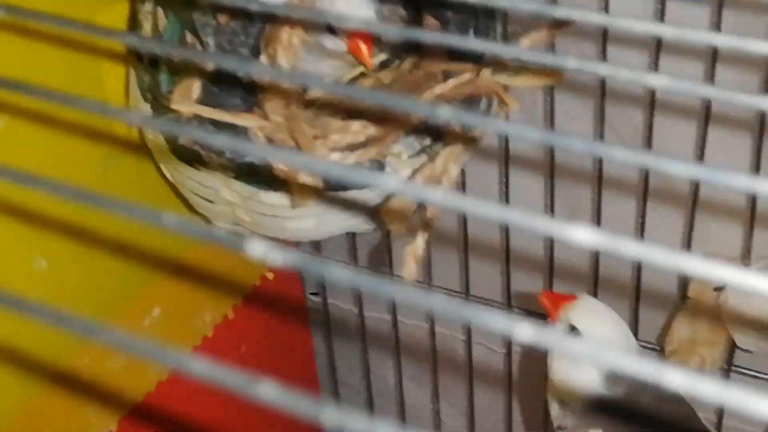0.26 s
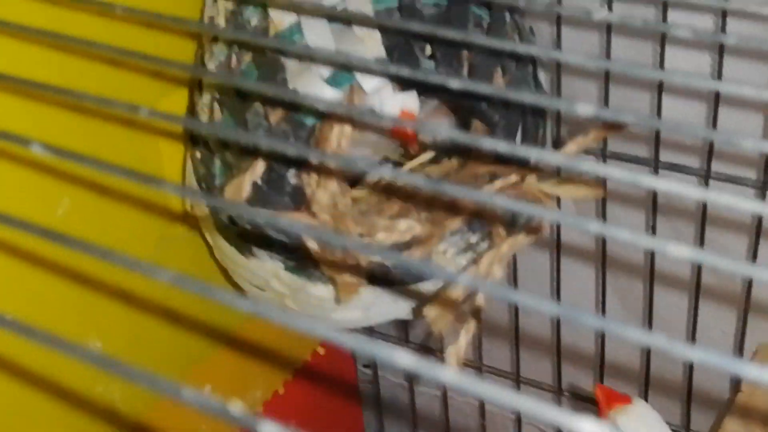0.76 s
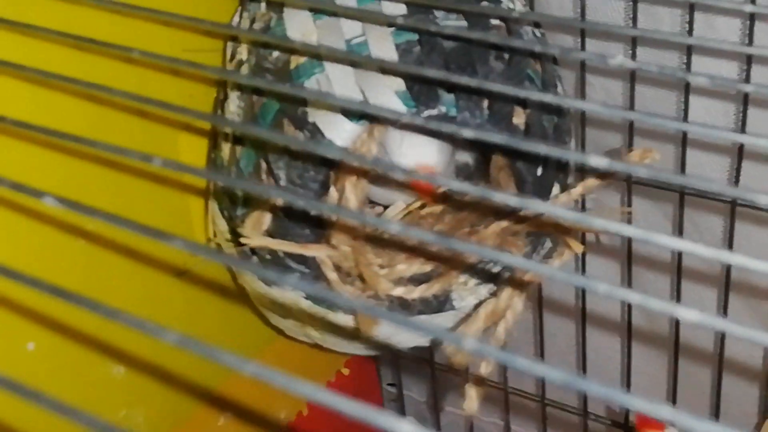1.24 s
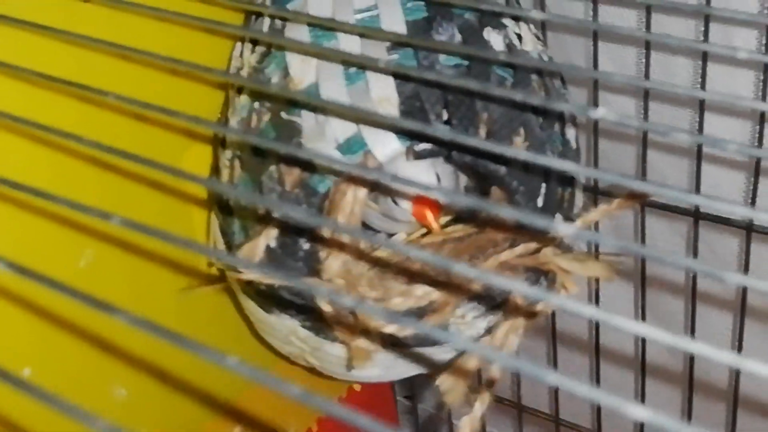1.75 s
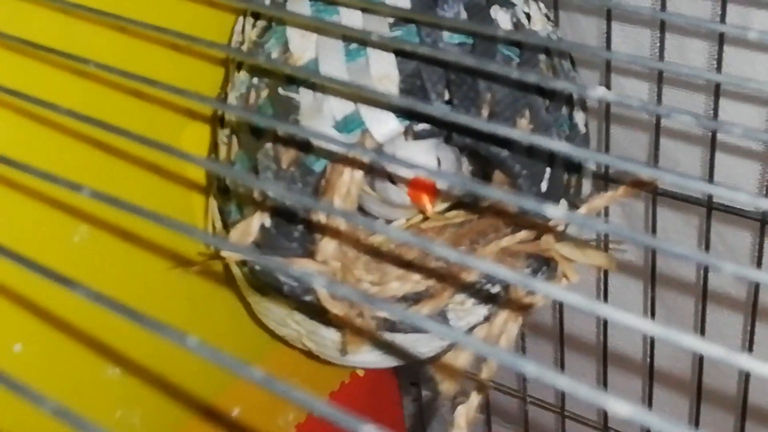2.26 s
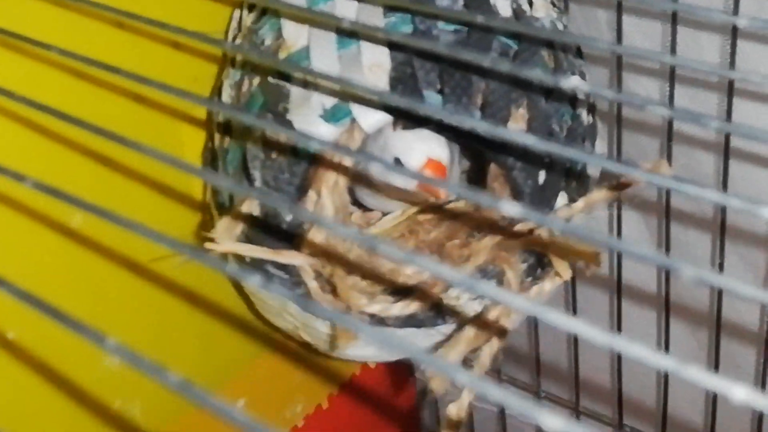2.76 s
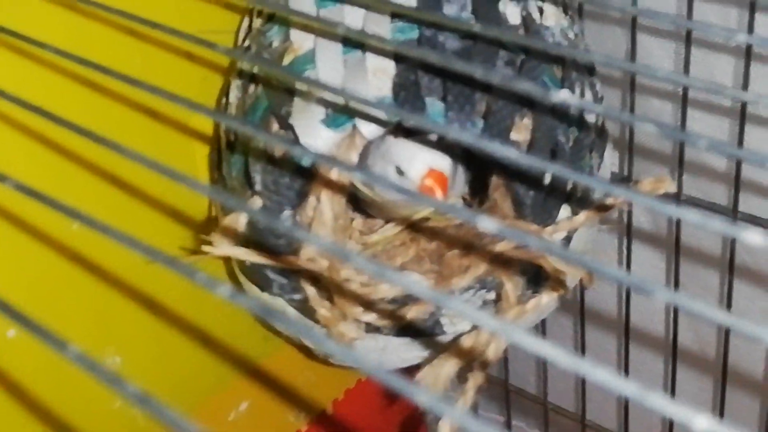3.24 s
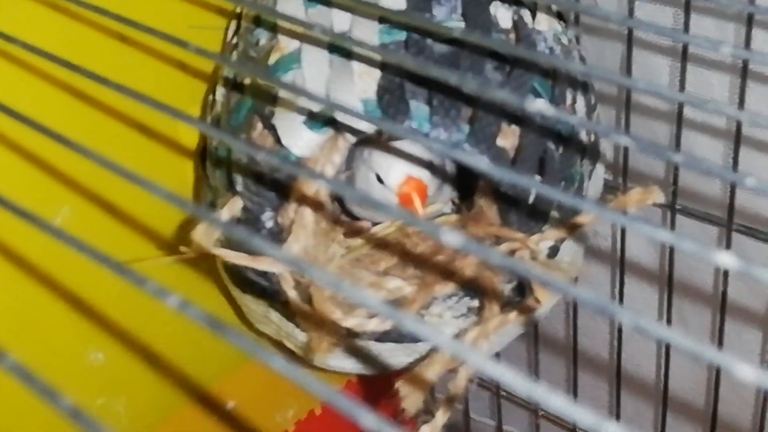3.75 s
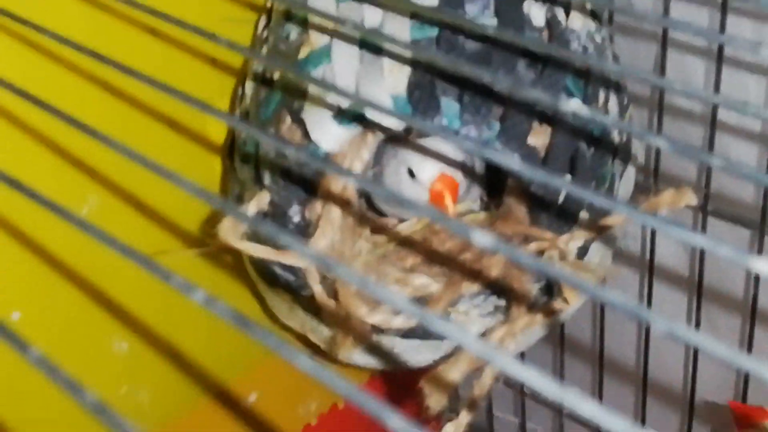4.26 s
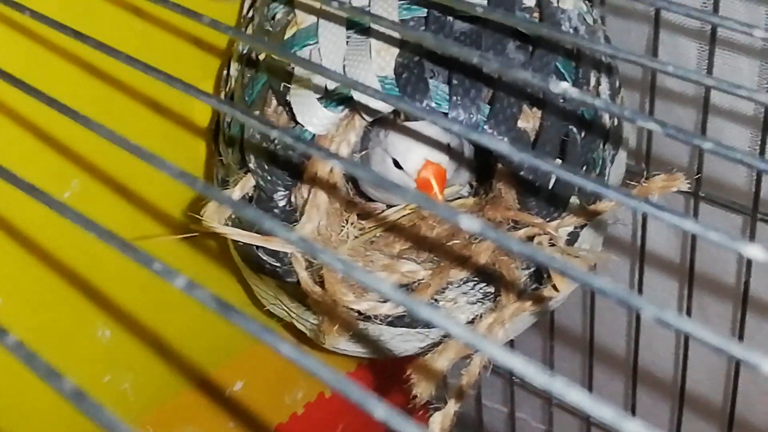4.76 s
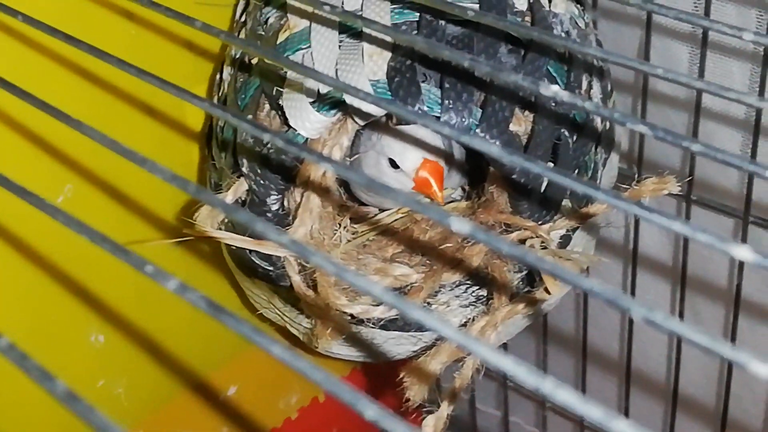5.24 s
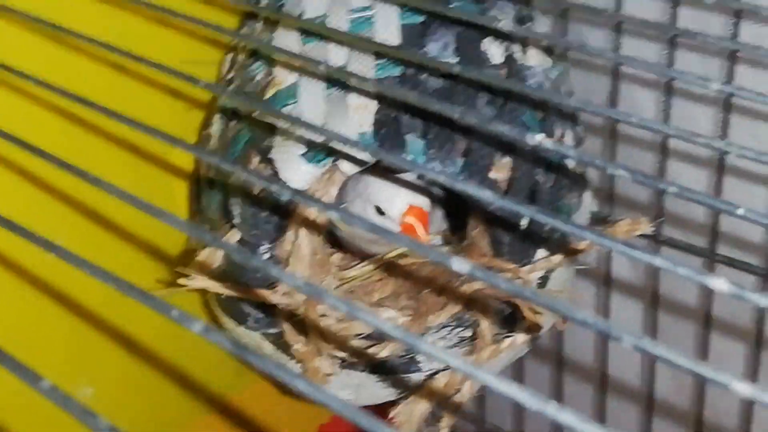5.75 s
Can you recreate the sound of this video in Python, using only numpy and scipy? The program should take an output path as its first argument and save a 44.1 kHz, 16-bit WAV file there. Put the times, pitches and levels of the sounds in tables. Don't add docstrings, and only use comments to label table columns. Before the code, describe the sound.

A male zebra finch sings close by in a wire cage indoors. From the start until about 3.3 s it runs through the same tune four times, each about 0.85 s: a nasal hum, sharp high ticks, a rasp, a piercing short whistle around 7 kHz, a clear bell-like note, then buzz, peal, growls and more ticks. At 3.3 s there is a very quiet murmur, then near silence with soft feather brushes around 4.0 s. Two nasal barks come at 4.1 and 4.2 s, three bright clangs at 4.4, 4.6 and 4.7 s, with a tiny flick of rustle, and a buzzy chirp at 4.9 s. The tune returns from 5.05 s to the end. At 5.9 s dull perch knocks and a strong grainy rustle join. Small-room echo, low building drone, faint hiss and soft handling rumble; handheld stereo, bird toward the right.

```python
import sys
import numpy as np
from scipy import signal
from scipy.fft import rfft, irfft, next_fast_len
from scipy.io import wavfile

SR = 44100
rng = np.random.default_rng(int(sys.argv[2]) if len(sys.argv) > 2 else 0)


def invert_db(x):
    u = np.asarray(x, float) / 20
    return 10 ** u


def store_wav(level_fs):
    pcm = np.round(np.clip(np.atleast_2d(level_fs), -1, 1) * 32767)
    wavfile.write(sys.argv[1], SR, pcm.T.astype(np.int16))


N = 264600
RUN_IN = SR // 10


def rms_one(x):
    return x / np.sqrt(np.mean(x ** 2) + 1e-20)


def at_hz(points, hz):
    points = np.array(points)
    return np.interp(np.log(hz), np.log(points[:, 0]), points[:, 1])


def wobble(shape, rate_hz):
    white = rng.standard_normal(shape)
    slow = signal.butter(2, rate_hz, fs=SR, output="sos")
    return signal.sosfilt(slow, white) * np.sqrt(SR / 2.2 / rate_hz)


def add(out, x, s):
    i = round(s * SR)
    x = x[max(-i, 0):len(out) - i]
    start = max(i, 0)
    out[start:start + len(x)] += x


def coloured(points, patchy_db):
    # (frequency [Hz], likeness [-1 to 1])
    likeness = [(60, 0.96), (180, 1), (550, -1.3), (1650, 0.089), (4970, 0.57), (15000, 0.096)]
    out = 0
    edges = 22 * 2 ** np.arange(0, 9.6, .5)
    white = rng.standard_normal((2, 2, N))
    flicker = wobble((len(edges), N // 64 + 1), 500)
    for k, (low, high) in enumerate(zip(edges, edges[1:])):
        hz = np.sqrt(low * high)
        if not points[0][0] < hz < points[-1][0]:
            continue
        band = signal.butter(2, [low, high], "band", fs=SR, output="sos")
        mid, side = signal.sosfilt(band, white[k % 2])
        alike = np.clip(at_hz(likeness, hz), -1, 1)
        flicker_here = np.interp(np.arange(N) / 64, np.arange(N // 64 + 1), flicker[k])
        gain = invert_db(at_hz(points, hz) + patchy_db * flicker_here)
        out = out + gain * (np.sqrt(1 + alike) * mid + np.sqrt(1 - alike) * side * [[1], [-1]])
    return rms_one(out)


def air():
    # (frequency [Hz], level per Hz [dB])
    air_colour = [(240, -39), (400, -10.5), (419, -24), (466, -6), (587, -10.5), (695, 14.5), (1100, 0),
                  (10800, -9), (15600, -16.5)]
    air_db = -76.5
    return invert_db(air_db + 12) * coloured(air_colour, patchy_db=1.0)


def drone():
    # (frequency [Hz], level per Hz [dB])
    drone_colour = [(12, -37), (20, -9.5), (54, -2.5), (140, -12.5), (200, -28), (260, -57.5), (440, -120)]
    return invert_db(-61.5) * coloured(drone_colour, patchy_db=3.0)


def handling():
    # (frequency [Hz], level per Hz [dB])
    hand_colour = [(41, -39), (70, -6), (113, -1), (177, -17.5), (249, -2.5), (510, -34), (600, -11.5),
                   (780, -55.5), (1320, -120)]
    # (time [s], level [dB])
    hand_levels = [(0.0, -34.5), (0.05, -39.5), (0.8, -56), (0.9, -44), (1.22, -60), (1.34, -41.5),
                   (1.67, -55.5), (1.82, -49.5), (1.89, -58.5), (2.59, -77), (2.86, -41.5), (2.94, -61.5),
                   (4.31, -63), (5.25, -84), (5.75, -55.5), (5.85, -73), (5.92, -54), (6.0, -44)]
    hand_db = np.interp(np.arange(N) / SR, *np.transpose(hand_levels))
    return invert_db(hand_db - 3.0) * coloured(hand_colour, patchy_db=6.5)


def knocks():
    # (time [s], frequency [Hz], level [dB], time to fall 60 dB [s])
    perch_hits = [
        (5.904, 281, -35.5, 0.044),
        (5.92, 300, -37.5, 0.053),
        (5.953, 284, -27.5, 0.019),
        (5.963, 110, -44, 0.051),
    ]
    out = np.zeros(N)
    t = np.arange(SR // 5) / SR
    for s, hz, level_db, t60 in perch_hits:
        add(out, invert_db(level_db - 60 * t / t60) * np.sin(2 * np.pi * hz * t), s)
    return out


def rustles():
    # (time [s], length [s], level [dB])
    brushes = [
        (3.96, 0.091, -53),
        (4.094, 0.037, -58),
        (4.689, 0.011, -49),
        (5.88, 0.053, -33),
        (5.919, 0.06, -39),
        (5.944, 0.18, -26),
    ]
    # (frequency [Hz], level per Hz [dB])
    feather_colour = [(300, -12), (1500, -4.5), (3000, 0), (6000, 0), (9000, -1.5), (15000, -27.5)]
    swell = np.zeros(N)
    for s, length, level_db in brushes:
        add(swell, invert_db(level_db) * signal.windows.tukey(round(length * SR), .6), s)
    grain = invert_db(1.5 * wobble(N, 150))
    return swell * grain * coloured(feather_colour, patchy_db=3.5)


def gesture(kind, length, onset_hz, end_hz, level_db):
    gestures = {"stack": (.18, .2, 1.5, 4.5), "tick": (.22, .3, .6, 1.5), "drop": (.15, .45, -9.5, 2.2),
                "rasp": (.15, .25, -8.5, 1.6), "whistle": (.25, .3, -4.5, 4.5), "bell": (.2, .22, 1.5, 9.5),
                "peal": (.2, .12, 8.5, 3.5), "tail": (.2, .2, 1.5, 1.2), "murmur": (.45, .3, 3.5, 1.3),
                "mutter": (.4, .3, -.6, 1.3), "growl": (.1, .3, -1.5, 1.3), "bark": (.2, .22, 1.5, .75),
                "chime": (.2, .25, 6.5, 5.5), "hum": (.2, .25, 1.5, 2.5), "ring": (.27, .33, 4.5, 2.5),
                "slide": (.3, .2, 6.5, 1.4), "clang": (.3, .48, -1.5, 6.5), "buzz": (.42, .38, .6, 1.2),
                "peep": (.2, .4, .6, 1.5)}
    voices = {"stack": (.1, .01, 5.5), "slide": (.35, .3, 1.5), "hum": (.1, .025, 4.5),
              "ring": (.08, .012, 4.5), "tick": (.01, .008, 1.5), "drop": (.15, .35, 1.5),
              "rasp": (.55, .35, 2.5), "whistle": (.01, .003, 2.5), "bell": (.5, .012, 6.5),
              "chime": (.95, .012, 3.2), "peal": (.8, .006, 7.5), "clang": (.9, .004, 8.5),
              "buzz": (.6, .13, 2.5), "growl": (.55, .1, 2.2), "bark": (.6, .04, 2.2),
              "tail": (.3, .1, 1.5), "peep": (.05, .6, 1.5), "murmur": (.6, .7, 1.5),
              "mutter": (.6, .7, 1.5)}
    throats = {"slide": (4400, 4200), "hum": (4800, 3000), "ring": (4800, 3900), "bell": (6500, 3900),
               "chime": (7300, 3400), "peal": (5000, 3800), "clang": (5900, 3400), "tail": (2700, 3300),
               "murmur": (1500, 1400), "mutter": (3300, 3100), "stack": (4700, 3850), "rasp": (7400, 4300),
               "buzz": (5200, 4000), "growl": (5100, 4400), "bark": (3900, 3400), "peep": (1900, 3100)}
    attack, release, swell_db, bend = gestures[kind]
    rough_onset, rough, clearing = voices[kind]
    attack, release = np.clip([attack, release], .03, .48)
    done = np.r_[0, np.linspace(attack, 1 - release, num=6), 1]
    left = 1 - done
    pitch = end_hz + (onset_hz - end_hz) * left ** bend
    pitch = pitch * (1 - .025 * (left == 0))
    level = level_db + swell_db * np.clip((done - attack) / (1 - attack - release), 0, 1)
    throat = pitch
    if kind in throats:
        throat_onset, throat_end = throats[kind]
        throat = throat_end + (throat_onset - throat_end) * left ** 1.156
    roughness = rough + (rough_onset - rough) * left ** clearing
    return list(zip(done * length, pitch, level, roughness, throat))


def note(rows, factor, beak_db, chest_db):
    # (frequency [Hz], level [dB])
    windpipe = [(500, -32), (1300, -6), (2000, -8), (3000, 2), (4500, -3.5), (6300, -2), (7600, -8.5),
                (9000, -6.5), (10500, -10), (12500, -25.5), (14200, -26.5), (16000, -52.5)]
    throat_width_hz, throat_peak_db = 1940, 13
    upper_ratio, upper_db = 1.95, 4
    chest_hz, chest_width_hz = 1570, 980
    breath_per_octave = .17

    s, *columns = np.transpose(sorted(rows))
    t = np.arange(s[0], s[-1], 1 / SR)
    pitch, level_db, rough, throat = [np.interp(t, s, c) for c in columns]
    rough = np.clip(rough, 0, 1)
    size = 4000
    waver, beat = wobble((2, size), 270)[:, -len(t):]
    k = np.arange(1, min(33, 2 + int(.4 * SR / pitch.min())))[:, None]
    blur = wobble((2, 32, size // 4), 1300)[:, :len(k)]
    blur = blur.repeat(4, axis=2)[..., -len(t):]
    hz = k * pitch * factor
    turns = np.cumsum(pitch * factor * (1 + .05 * rough * waver)) / SR

    peak_db = throat_peak_db / (1 + (2 * (hz - throat) / throat_width_hz) ** 2)
    peak_db += upper_db / (1 + (2 * (hz - upper_ratio * throat) / throat_width_hz) ** 2)
    above = np.maximum(np.log2(hz / throat), 0)
    purer_db = 4 * (pitch > 1200) * (1 - rough) ** 4
    peak_db += (beak_db - purer_db) * above
    peak_db += chest_db / (1 + (2 * (hz - chest_hz) / chest_width_hz) ** 2)
    peak_db += 2 * rng.standard_normal((32, 1))[:len(k)] * (k > 1)
    rough = np.clip(rough + breath_per_octave * above * (k > 3), 0, 1)
    gain = invert_db(at_hz(windpipe, hz) + peak_db) * (hz < .4 * SR)
    gain = gain / np.sqrt(np.sum(gain ** 2, axis=0) / 2)

    angle = 2 * np.pi * k * turns + .1 * k ** 2
    blurred = (blur[0] * np.sin(angle) + blur[1] * np.cos(angle)) / np.sqrt(2)
    harmonics = np.sqrt(1 - rough) * np.sin(angle) + np.sqrt(rough) * blurred
    voice = np.sum(gain * harmonics, axis=0)
    fade = np.interp(t, s[[0, 1, -2, -1]], [0, 1, 1, 0])
    return voice * invert_db(level_db + 5 * rough[0] * beat) * fade


def finch():
    colours = {"stack": (-5, 0.09), "slide": (-15.5, 13.8), "hum": (-0.5, 0.5), "ring": (-4.5, -13),
               "tick": (-8, .1), "drop": (-11, .1), "rasp": (-0.77, .6), "whistle": (6, .1),
               "bell": (2.5, -2), "chime": (-1.5, -3.5), "peal": (1, -20), "clang": (-14, -12),
               "buzz": (-4.5, 6), "growl": (-0.5, 1.7), "bark": (5.5, -0.98), "tail": (-4.5, 4.96),
               "peep": (-4.5, 8.7), "murmur": (3.7, 0.086), "mutter": (4.6, .1)}
    # (kind, time from phrase start [s], length [s], onset [Hz], end [Hz], level [dB])
    opening = [("stack", -.002, .082, 520, 579, -26.5), ("slide", .082, .043, 1290, 760, -33),
               ("hum", .118, .036, 735, 712, -26), ("ring", .118, .033, 1470, 1428, -26),
               ("tick", .168, .008, 5700, 5900, -17), ("tick", .171, .006, 6800, 7000, -25),
               ("tick", .1985, .008, 4370, 4350, -17.5), ("drop", .2058, .010, 4350, 2400, -19),
               ("rasp", .234, .038, 1290, 900, -28), ("whistle", .276, .021, 6400, 7060, -13),
               ("tick", .305, .007, 4750, 4700, -26), ("drop", .312, .008, 4500, 3000, -29),
               ("tick", .3485, .0065, 4300, 4600, -16), ("drop", .355, .009, 4400, 2500, -25),
               ("bell", .368, .032, 1550, 1366, -21), ("tail", .392, .026, 1050, 800, -37)]
    middle = [
        ("buzz", .002, .038, 590, 420, -28),
        ("peal", .061, .020, 1900, 1960, -23),
        ("tick", .078, .008, 5850, 5550, -20),
        ("drop", .085, .007, 5500, 3100, -17),
        ("growl", .089, .033, 720, 535, -21.5),
        ("growl", .118, .047, 715, 565, -24.5),
    ]
    close = [
        ("buzz", .001, .052, 757, 500, -28),
        ("tick", .0692, .0058, 4600, 4640, -16),
        ("drop", .0755, .009, 4375, 2600, -23),
        ("chime", .091, .0355, 1540, 1428, -28),
    ]
    lead_bark = [
        ("bark", .001, .06, 680, 480, -25.5),
    ]
    lead_chime = [
        ("peep", .001, .021, 1950, 850, -43),
        ("clang", .038, .032, 1900, 1825, -16),
        ("tail", .064, .045, 710, 510, -34),
    ]
    asides = [
        ("murmur", .001, .065, 784, 610, -45),
        ("mutter", .01, .052, 800, 610, -52),
        ("tick", 2.535, .04, 4100, 3550, -46),
    ]
    # (time [s], level change [dB], slower by [%], higher by [%])
    openings = [(0.0635, -0.53, -1.12, 0.66), (0.9031, -1.1, 0.22, .1), (1.76, -1.35, -0.11, -0.09),
                (2.621, -1, 1, -0.47), (5.0434, -0.65, -0.42, -0.016)]
    middles = [(.517, -.4, -0.66, .6), (1.3632, -.6, -0.72, .9), (2.22, .1, .1, .1), (5.5015, .3, 0.31, .1)]
    closes = [(-.123, 4.5, 0.064, .1), (0.726, 0.89, 0.051, 1.2), (1.5789, .3, 0.02, .4),
              (2.436, .1, .1, .1), (4.8645, 2.1, -.3, .8), (5.716, 0.5, .6, .4)]
    lead_barks = [(4.139, .1, .1, .1), (4.2396, 0.19, .1, 2.2)]
    lead_chimes = [(4.372, .1, .1, 1.8), (4.541, 0.89, .1, -2), (4.7065, 0.76, .1, -2)]
    song = [(opening, openings), (middle, middles), (close, closes), (lead_bark, lead_barks),
            (lead_chime, lead_chimes), (asides, [(3.335, 0, 0, 0)])]
    out = np.zeros(RUN_IN + N)
    for phrase, sung in song:
        for s, change_db, slower, higher in sung:
            for kind, delay, *shape in phrase:
                voice = note(gesture(kind, *shape), 1 + higher / 100, *colours[kind])
                start_s = RUN_IN / SR + s + delay * (1 + slower / 100)
                add(out, invert_db(change_db) * voice, start_s)
    return out


def echoes(t60_table, start_s):
    wall_dull_db = -0.63
    t = np.arange(int(.6 * SR)) / SR
    out = 0
    white = rng.standard_normal((2, len(t))) * (t > start_s)
    for low in 350 * 2. ** np.arange(6):
        octave = signal.butter(2, [low, min(2 * low, .45 * SR)], "band", fs=SR, output="sos")
        band = signal.sosfilt(octave, white) * invert_db(wall_dull_db * np.log2(low))
        out = out + band * invert_db(-60 * t / at_hz(t60_table, 1.4 * low))
    return out / np.sqrt(np.sum(out ** 2, axis=1, keepdims=True))


def at_microphones(x):
    # (frequency [Hz], left minus right [dB])
    shadow = [(600, 4), (1300, -3), (2400, -2), (3500, -10), (4400, -10), (5700, -5), (6300, -3),
              (7000, -14), (8300, 3), (10500, 5), (15000, 2)]
    # (frequency [Hz], left ahead [radians])
    left_lead = [(300, -.2), (1400, .3), (3500, -.6), (4300, 1.2), (5200, 1.5), (6100, 2.2), (7300, 3.9),
                 (9000, 4.8)]
    # (frequency [Hz], time to fall 60 dB [s])
    room_t60 = [(500, .3), (3000, .3), (6000, .26), (9000, .21), (14000, .14)]
    near_db, near_t60_s, room_db = -8, .025, -11
    size = next_fast_len(len(x) + 1024)
    hz = np.maximum(np.fft.rfftfreq(size, 1 / SR), 1)
    half_db = at_hz(shadow, hz) / 2
    paths = [invert_db(half_db) * np.exp(1j * at_hz(left_lead, hz)), invert_db(-half_db)]
    direct = irfft(rfft(x, size) * paths, size)[:, RUN_IN:len(x)]
    near = invert_db(near_db) * echoes([(500, near_t60_s), (9000, near_t60_s)], 0.0011)
    room = invert_db(room_db) * echoes(room_t60, 0.011)
    return direct + signal.fftconvolve(x[None], near + room, axes=1)[:, RUN_IN:len(x)]


def scene():
    background = air() + drone() + handling()
    return background + knocks() + rustles() + at_microphones(invert_db(2) * finch())


def band_limit(x):
    return signal.sosfilt(signal.butter(12, 15750, fs=SR, output="sos"), x)


def record(dry):
    top_cut = signal.cheby2(12, 60, 15750, fs=SR, output="sos")
    cut = signal.sosfilt(top_cut, dry)
    mix = 1.344 * np.tanh(cut / 1.396)
    return band_limit(mix)


dry = scene()
out = record(dry)
store_wav(out)
```